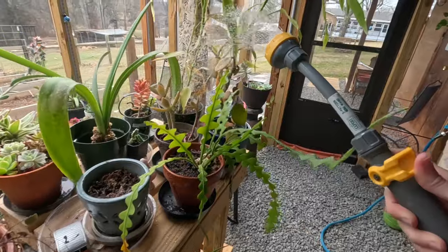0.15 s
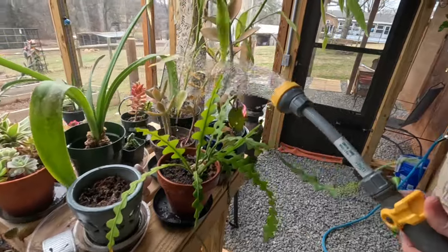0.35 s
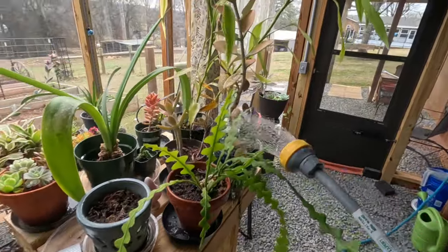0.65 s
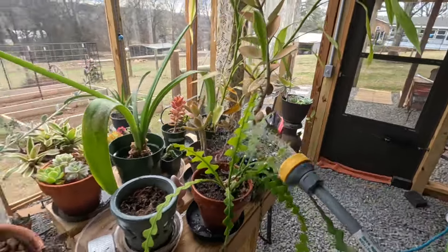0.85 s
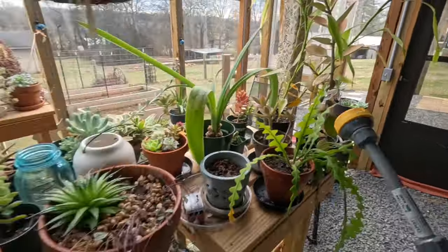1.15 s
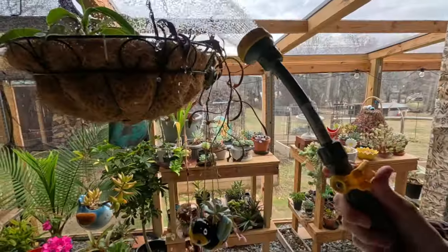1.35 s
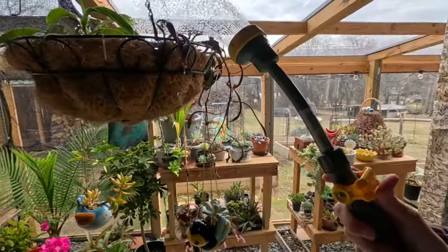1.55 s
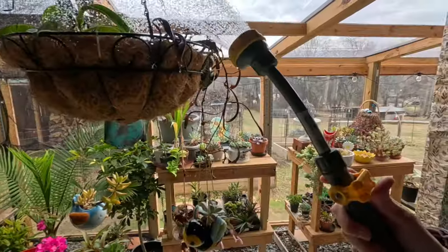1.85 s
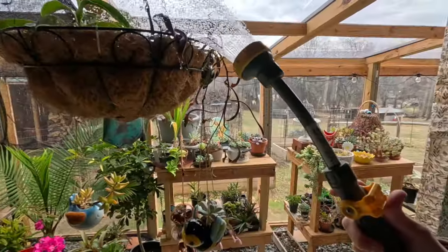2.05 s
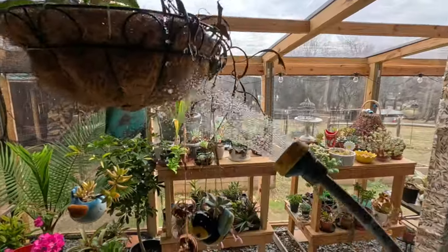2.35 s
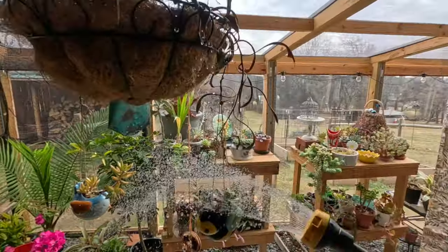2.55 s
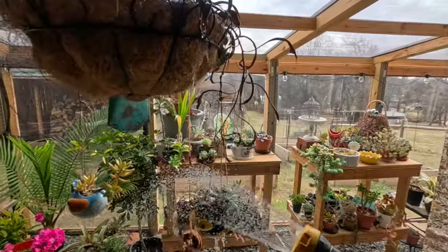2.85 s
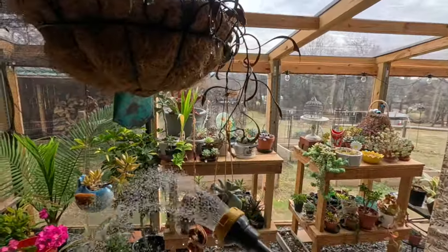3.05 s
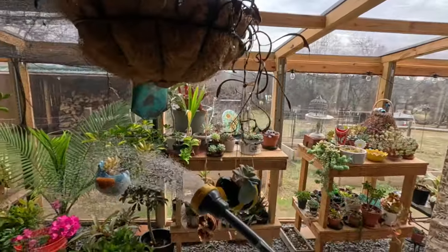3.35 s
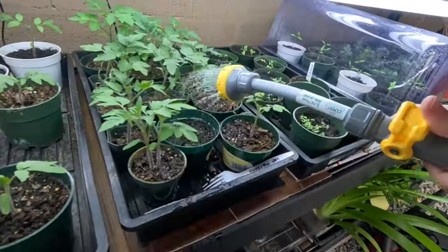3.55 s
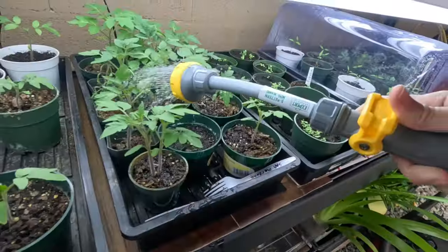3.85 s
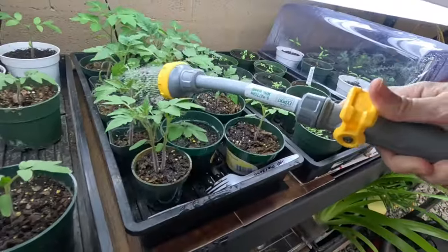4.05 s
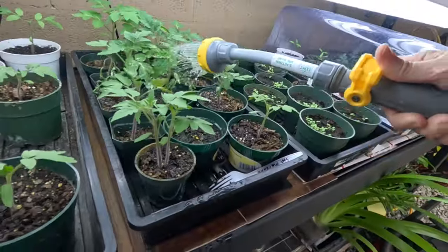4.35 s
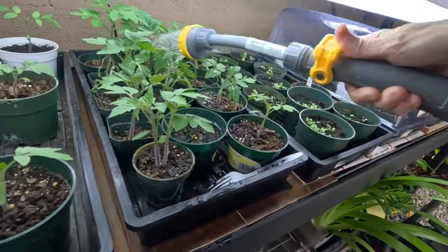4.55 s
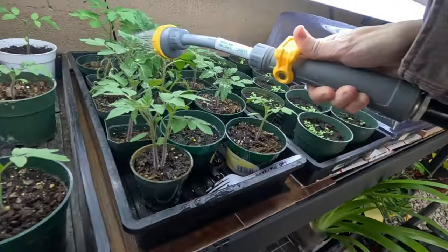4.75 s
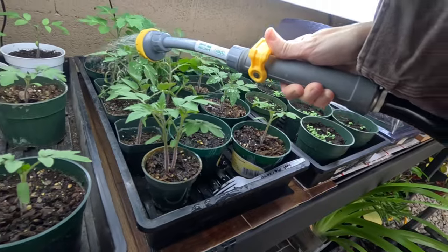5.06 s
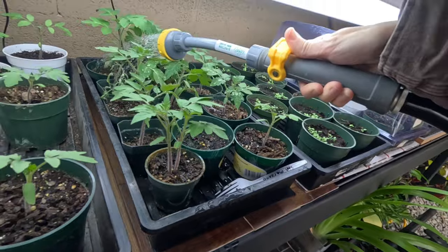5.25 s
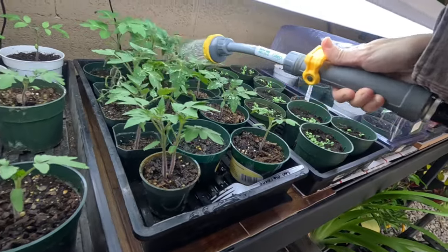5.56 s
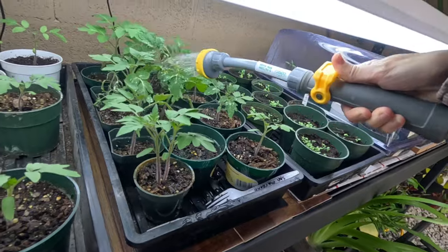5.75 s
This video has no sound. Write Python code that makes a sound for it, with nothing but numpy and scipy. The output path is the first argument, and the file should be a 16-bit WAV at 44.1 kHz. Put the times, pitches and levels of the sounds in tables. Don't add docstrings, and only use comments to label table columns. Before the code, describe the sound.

Three joined shots of watering plants: spray over pots, stopping briefly with draining water and a leaf brush; spray at a hanging basket, with many uneven knocking drips on a hollow tub; then steady spray on seedlings. The hiss is airy and high, ringing slightly in the tube and shifting as the wand moves. Low gusty rumble and a soft fan hum lie beneath. Close stereo microphone, short glassy greenhouse reflections.

```python
import sys
import numpy as np
from scipy import signal
from scipy.io import wavfile
from scipy.ndimage import uniform_filter1d

SR = 44100
rng = np.random.default_rng(int(sys.argv[2]) if len(sys.argv) > 2 else 0)


def linear_from_db(decibels):
    return 10 ** (np.asarray(decibels, float) / 20)


def master(y):
    cut = np.clip(np.atleast_2d(y).T, -1, 1)
    pcm = np.round(cut * 32767)
    wavfile.write(sys.argv[1], SR, pcm.astype(np.int16))


N = 259749
FRAME = 1024
BINS = np.fft.rfftfreq(FRAME, 1 / SR)

SPOTS = [0, 1.2175, 3.471, 5.9]

# time in seconds, nearness in dB, swing across the view,
# upward tilt, drop towards the bench (these three in units of pose, 0 = usual).
POSE = [
    [(0, 0, 0.58, -0.066, 0.21), (.35, 0.8, 0.27, 0.25, 0.55), (.9, 0.2, -0.75, 0.017, -0.6)],
    [(1.22, -0.5, 0.48, 1, 1), (1.7, 1, 1.26, 0.9, 0.44), (2.1, .2, 2.3, 1.8, -0.24),
     (2.5, 0, -1, -0.5, 0.42), (2.92, -0.7, -1.4, -0.3, -0.4), (3.15, 0.3, 1.8, 4, -0.8),
     (3.47, -0.1, -0.8, 3, -1.2)],
    [(3.47, -1, -0.41, 0.47, 1.6), (3.85, 1.45, -0.54, 0.027, 1.3), (4.25, 0.75, -0.76, 0.088, 1.7),
     (4.6, -0.7, -1.64, -0.61, -0.92), (4.85, 0.6, 1.2, -0.91, -1.6), (5.15, 1, 1.2, 0.5, -1.8),
     (5.55, 0.5, -0.43, -0.3, -0.5), (5.89, -1, 0.74, -1.4, -1.7)],
]
# time in seconds, flow in dB.
VALVE = [(.93, 0.5), (.98, -5.5), (1.01, -24.5), (1.04, -36), (1.07, -41), (1.2, -64)]
TUBE_HZ = [(2810, 4830, 5800, 7050, 7960, 9220), (2574, 4964, 5720, 7160, 7760, 9980),
           (2875, 4745, 5730, 7000, 7670, 10700)]
TUBE_DB = [(-30.5, -29, -36, -44, -31.5, -31), (-33, -28, -34, -27.5, -29, -34),
           (-33.5, -27, -28, -29.5, -31, -34)]
TUBE_WIDTH_HZ = [640, 584, 478, 510, 443]
# dB per unit of swing, of tilt, of drop.
BEAMS = [(-1.5, 2.5, 3.25), (3, -0.16, 1.9), (2, 1, 1.2), (-1, -3.5, 0.13), (-4.5, -0.5, 1.5),
         (2.5, -3.5, 0.98)]
# pitch in Hz, width in Hz, level in dB.
GRIP = [(1279, 140, -50), (967, 60, -61)]
FIRST_HZ_PER_TILT, SECOND_HZ_PER_DROP, PLATE_HZ_PER_SWING = 153, -68, 200
PLATE_WIDTH_HZ = 1150
BENCH_HZ = (3930, 3990, 3610)
BENCH_DB_PER_TILT, BENCH_DB_PER_DROP = 1, -3
PAN_DB_PER_DROP = -0.46

# frequency in Hz, level in dB per Hz.
FIZZ_POTS = [(410, -59), (700, -29), (905, -14.5), (1090, -23.5), (1270, -11.5), (1910, -15), (2690, -3),
             (4330, -5), (5070, 3), (6320, -3.5), (7050, 4.5), (8900, -9.5), (13000, -18)]
# frequency in Hz, level in dB per Hz.
FIZZ_BASKET = [(410, -69), (700, -68), (916, -14), (1110, -26), (1290, -12.5), (1930, -20.5), (2890, -3.5),
               (4220, -10), (4950, 0.5), (6320, -7), (7050, -1.5), (9230, -8.5), (10300, -12), (13000, -23)]
# frequency in Hz, level in dB per Hz.
FIZZ_TRAY = [(410, -62), (700, -38), (1140, -26), (1290, -15.5), (1880, -17), (2690, -3), (3690, -9),
             (4660, -4), (6320, -2.5), (7140, -5.5), (8470, -7.5), (11500, -11.5), (13000, -17)]
# frequency in Hz, gain in dB.
TOP = [(12400, 0), (13200, -3), (14500, -14)]
# frequency in Hz, level in dB per Hz.
WET = [(150, -27), (240, 2.5), (504, -7.5), (939, -14.5), (1140, -11.5), (1340, -17), (1980, -16.5),
       (2200, -19), (14000, -51)]
WET_DB = (-58, -67, -59)
# frequency in Hz, level in dB per Hz.
DRAIN = [(530, -52), (900, -26), (1130, -8), (1550, -9), (1990, -17), (2150, -12), (13500, -25.5)]
# time in seconds, level in dB.
DRAIN_DB = [(1, -53), (1.07, -47), (1.12, -44.5), (1.2, -44)]
# middle in seconds, level in dB, half length in seconds.
RUSTLES = [(.3, -59, 0.25), (0.905, -48.5, 0.082), (1.174, -42, 0.048), (3.86, -51, 0.22),
           (4.266, -50, .045), (5.35, -59, 0.16)]
FIZZ_DB, FIZZ_DB_PER_SWING = (-32, -30, -30), -0.2
DRIBBLE_DB = 9
SPLASH_DB, SPLASH_T60_S = -16, 0.51

# frequency in Hz, level in dB per Hz.
RUMBLE = [(12, -31), (22, -4.5), (57, 12.5), (90, -1), (125, 0.5), (190, -6.5), (290, -30), (400, -47),
          (600, -66), (900, -120)]
# middle in seconds, level in dB.
GUSTS = [(.3, -39), (1.04, -37.5), (1.55, -37), (2.05, -34), (3.25, -36), (3.62, -33.5), (4.45, -32.5),
         (4.67, -34), (4.83, -38), (5.55, -40), (5.85, -42)]
RUMBLE_DB = (-38, -39, -36.5)
GUST_S, GUSTY_DB = 0.078, 1

# time in seconds, level in dB.
HUM = [(0, -53), (1.2, -53.5), (1.5, -47), (2.5, -48), (3.3, -50), (3.6, -40.5), (4.55, -39), (4.71, -49),
       (4.84, -43.5), (4.99, -54), (5.38, -40), (5.89, -48.5)]
HUM_HZ = 163

# pitch in Hz, level in dB, t60 in seconds.
POT = (230, -25, 0.14)
# start in seconds, peak in dB, brightness in dB, lean to the deepest mode in dB.
DRIPS = [(1.438, -15.5, -7.5, -4), (1.476, -31, -4, 5), (1.546, -19, -0.5, -3), (1.612, -20.5, 3, -12),
         (1.736, -27.5, 4.5, -3), (1.846, -18, -4, -1), (1.885, -24.5, -1.5, -24), (2.212, -31.5, -4, -10),
         (2.261, -18.5, -14, -5.5), (2.297, -44, -14, -6), (2.385, -29, -13, -1), (2.413, -24.5, -4, -3),
         (2.507, -14.5, -5, 6), (2.539, -29, -13, 1), (2.658, -38, 5, 0), (2.682, -12.5, -15, -0.5),
         (2.767, -19.5, -15, 1), (2.806, -21.5, 0, 1), (2.864, -24.5, 6.5, 9), (2.917, -13, 1, -11),
         (2.954, -16, -3, 15), (2.963, -18, -14, -25), (3.013, -41, -1, 0), (3.093, -26.5, -6, -12),
         (3.177, -18.5, 0, -4), (3.234, -23, 2.5, -8), (3.337, -21, -10, 4), (3.411, -20, 2, -1),
         (3.433, -25, -5, -5)]
# start in seconds, peak in dB, brightness in dB, lean in dB.
STRAYS = [(0.86, -42, 15, -6), (1.168, -39, -14, -13), (3.622, -36, -1, -7), (3.764, -34, -6, -1),
          (4.215, -36, -13, 23), (4.259, -28, -9, -8), (4.925, -52, 21, 2), (4.954, -49, 17, 16),
          (5.222, -46, 18, 3), (5.245, -47, 19, 0), (5.379, -40, 0, 6)]
# pitch in Hz, level in dB, share of the t60.
WALLS = [(267, 0, 1.3), (334, 1, 1), (385, -9, .7), (506, -5, .75), (592, -7, .8)]
# pitch in Hz, level in dB, share of the t60.
RIM = [(830, 0, .3), (918, 6, .5), (1010, 1, .3), (1262, 4, .4), (1430, 3, .3), (1650, 2, .25),
       (2000, -3, .2)]
TUB_T60_S, TRAY_T60_S = 0.13, 0.069
TRAY_FACTOR = 1.7
SCATTER_DB = 2.5
# start in seconds, peak in dB.
TICKS = [(1.057, -37), (1.07, -56), (1.097, -42), (1.159, -50)]

# frequency in Hz, likeness 0-1.
SAME = [(60, .985), (300, .96), (700, .8), (1500, .78), (3000, .9), (4800, .88), (5600, .7), (6200, .45),
        (7000, .65), (7800, .7), (13500, .3)]
# frequency in Hz, radians by which the left leads.
LEAD = [(100, -.05), (700, -.15), (1400, -.3), (2700, -.7), (3500, -.85), (4800, -.65), (5600, -.4),
        (6300, 0), (6900, .75), (7600, .2), (8300, 0)]
# frequency in Hz, left minus right in dB.
TILT = [(300, 1), (1300, 0), (2500, -2.5), (4800, -3), (6000, -2), (7000, 5), (8300, -0.5), (13000, .3)]
# time in seconds, frequency in Hz where the treble starts to drop out.
BANDWIDTH = [(0, 13700), (1.4, 13300), (1.55, 14000), (2.45, 14100), (2.5, 12900), (3, 13000), (3.1, 13650),
             (5.89, 13750)]
# frequency in Hz, chance 0-1 that a left-right difference band stays.
KEEP_SIDE = [(1700, 1), (2000, .8), (2400, .98), (7400, 1), (8000, .55), (8400, .006), (11500, .01),
             (11900, .45), (12500, .5), (13100, .15), (13700, 0)]


def evened(x):
    return x / np.sqrt(np.mean(x ** 2) + 1e-20)


def read(points, hz):
    f, value = np.transpose(points)
    return np.interp(np.log(hz + 1), np.log(f + 1), value)


def columns(rows, t):
    s, *values = np.transpose(rows)
    return [np.interp(t, s, v) for v in values]


def unit(shape, lo=0, hi=SR):
    return shape / shape[(BINS >= lo) & (BINS < hi)].sum(0)


def peak(hz, width):
    return unit((1 + (2 * (BINS[:, None] - hz) / width) ** 2) ** -2.2)


def patches(frames, bins, long):
    z = rng.standard_normal((frames, len(BINS)))
    z = uniform_filter1d(z, long, 0)
    return evened(uniform_filter1d(z, bins, 1)).T


def swells(rows, t):
    return sum(linear_from_db(2 * db) * np.exp(-((t - s) / half) ** 2) for s, db, half in rows)


def ports(shared, stray, hz):
    same = np.clip(read(SAME, hz), 0, 1)
    turn = np.exp(.5j * read(LEAD, hz))
    tilt = linear_from_db(read(TILT, hz) / 2)
    left = shared * turn * tilt
    right = (same * shared + np.sqrt(1 - same ** 2) * stray) / (turn * tilt)
    mean_power = (tilt ** 2 + tilt ** -2. + 2 * same * (turn ** 2).real) / 4
    return np.array([left, right]) / np.sqrt(mean_power)


def noise(power, size=FRAME):
    a, b, c, d = rng.standard_normal(power.shape[::-1] + (4,)).T
    hz = np.fft.rfftfreq(size, 1 / SR)[:, None]
    z = ports(a + 1j * b, c + 1j * d, hz) * np.sqrt(power * 3 / 4)
    return signal.istft(z, nperseg=size, noverlap=size * 3 // 4)[1]


def valve_db(spot, t):
    return columns(VALVE, t)[0] * (spot == 0)


def wand(spot, t):
    near_db, swing, tilt, drop = columns(POSE[spot], t)
    levels_db = np.array(TUBE_DB[spot])[:, None] + near_db + np.array(BEAMS) @ [swing, tilt, drop]
    first, second, *upper, plate = TUBE_HZ[spot]
    first = first + FIRST_HZ_PER_TILT * tilt
    second = second + SECOND_HZ_PER_DROP * drop
    plate = plate + PLATE_HZ_PER_SWING * swing
    pitches = (first, second, *upper, plate)
    widths = (*TUBE_WIDTH_HZ, PLATE_WIDTH_HZ)
    tube = sum(linear_from_db(2 * db) * peak(hz, width) for db, hz, width in zip(levels_db, pitches, widths))
    grip = sum(linear_from_db(2 * db) * peak(hz, width) for hz, width, db in GRIP)
    comb_db = 2.0 * patches(len(t), bins=3, long=22) + 1.23 * patches(len(t), bins=100, long=5)
    return (tube + grip) * linear_from_db(2 * (comb_db + valve_db(spot, t)))


def splashes(spot, t):
    here = [row[:2] for row in DRIPS + STRAYS if SPOTS[spot] < row[0] < SPOTS[spot + 1]]
    s, db = np.transpose(here)[:, :, None]
    fading_db = db + SPLASH_DB - 60 * abs(t - s) / SPLASH_T60_S
    return (linear_from_db(2 * fading_db) * (t > s)).sum(0)


def spray(spot, t):
    near_db, swing, *_ = columns(POSE[spot], t)
    flow_db = valve_db(spot, t)
    dribble_db = np.clip(-flow_db / 3, 0, DRIBBLE_DB)
    fizz_db = FIZZ_DB[spot] + near_db + FIZZ_DB_PER_SWING * swing + flow_db + dribble_db
    colour = [FIZZ_POTS, FIZZ_BASKET, FIZZ_TRAY][spot][:-1]
    jets = unit(linear_from_db(2 * (read(colour, BINS) + read(TOP, BINS))), lo=8590, hi=12580)[:, None] * linear_from_db(2 * fizz_db)
    rustles = swells([row for row in RUSTLES if row[0] > SPOTS[spot]], t)
    patter = linear_from_db(2 * (WET_DB[spot] + flow_db)) + rustles + splashes(spot, t)
    wet = unit(linear_from_db(2 * read(WET, BINS)), lo=300, hi=970)[:, None] * patter
    drain_db = columns(DRAIN_DB, t)[0] - 99 * (spot > 0)
    drain = unit(linear_from_db(2 * read(DRAIN, BINS)))[:, None] * linear_from_db(2 * drain_db)
    flicker_db = 2.9 * patches(len(t), bins=4, long=25) + 0.47 * patches(len(t), bins=90, long=2)
    return (jets + wet + drain) * linear_from_db(2 * flicker_db)


def bench(spot, t):
    _, _, tilt, drop = columns(POSE[spot], t)
    dips = sum(np.exp(-((BINS[:, None] - BENCH_HZ[spot] / k) / 280) ** 2) for k in (1, 2))
    return linear_from_db(2 * (BENCH_DB_PER_TILT * tilt + BENCH_DB_PER_DROP * drop) * dips)


def thrift(x, start):
    mid_side = [x[0] + x[1], x[0] - x[1]]
    hz, t, z = signal.stft(mid_side, SR, "cosine", nperseg=2048, noverlap=1024)
    luck = rng.random((len(t) // 2 + 1, 65, 2)).repeat(2, 0)[:len(t)].T
    band_hz = (np.arange(65)[:, None] + .5) * 16 * hz[1]
    over = (band_hz - columns(BANDWIDTH, start + t)[0]) / 1300
    keep = luck < np.array([.4 - over, read(KEEP_SIDE, band_hz) + 0 * over])
    hole_chance = np.clip((hz[:, None] - 6000) / 70000, 0, 1)
    holes = rng.random((len(t), 257)).T.repeat(4, 0)[:len(hz)] < hole_chance
    z = z * keep[:, np.arange(len(hz)) // 16] * ~holes
    mid, side = signal.istft(z, SR, "cosine", nperseg=2048, noverlap=1024)[1]
    return np.array([mid + side, mid - side]) / 2


def rumble(spot, count):
    t = SPOTS[spot] + np.arange(count // 512 + 5) * 512 / SR
    hz = np.fft.rfftfreq(2048, 1 / SR)
    shape = linear_from_db(2 * read(RUMBLE, hz))
    shape = shape / shape[(hz >= 30) & (hz < 130)].sum()
    level = linear_from_db(2 * RUMBLE_DB[spot]) + swells([(*gust, GUST_S) for gust in GUSTS], t)
    restless = evened(uniform_filter1d(rng.standard_normal(len(t)), size=6))
    level = level * linear_from_db(2 * GUSTY_DB * restless)
    return noise(shape[:, None] * level, size=2048)[:, :count]


def fan():
    wander = evened(signal.resample(rng.standard_normal((2, 90)), N, axis=1))
    turns = np.cumsum(HUM_HZ + 1.2 * wander[0]) / SR
    level_db = columns(HUM, np.arange(N) / SR)[0] + 1.2 * wander[1]
    return np.sqrt(2) * linear_from_db(level_db) * np.sin(2 * np.pi * turns + np.array([[-.13], [.13]]))


def clay_pot():
    t, out = np.arange(12000) / SR, np.zeros(N)
    hz, db, t60 = POT
    out[:len(t)] = linear_from_db(db - 60 * t / t60) * np.sin(2 * np.pi * hz * t)
    return out


def drips():
    t, out = np.arange(12000) / SR, np.zeros(N + 12000)
    spread, rise = .01, 1 - np.exp(-t / .0009)
    rows = DRIPS + STRAYS
    for (s, db, bright_db, lean_db), luck in zip(rows, rng.standard_normal((len(rows), 24))):
        smaller, t60 = (TRAY_FACTOR, TRAY_T60_S) if s > SPOTS[2] else (1, TUB_T60_S)
        modes = WALLS[:1] + [(hz * smaller, d, share) for hz, d, share in WALLS[1:]] + RIM
        ring = []
        for (hz, d, share), u, v in zip(modes, luck[:12], luck[12:]):
            decay = linear_from_db(d + SCATTER_DB * u - 60 * t / (share * max(t60, .02)))
            ring.append(decay * np.sin(2 * np.pi * hz * (1 + spread * v) * t))
        walls = linear_from_db(lean_db) * ring[0] + sum(ring[1:len(WALLS)])
        rim = sum(ring[len(WALLS):])
        sound = walls / abs(walls).max() + linear_from_db(bright_db + 3.5) * rim / abs(rim).max()
        out[round(s * SR):][:len(t)] += linear_from_db(db + 2.0) * sound * rise
    return out[:N]


def last_droplets():
    t, out = np.arange(12000) / SR, np.zeros(N)
    for s, db in TICKS:
        out[round(s * SR):][:len(t)] += linear_from_db(db - 60 * t / .006) * np.sin(2 * np.pi * 11600 * t)
    return out


def greenhouse(x):
    at = np.arange(200, 9000, 20) + rng.integers(0, 20, (2, 440))
    taps = np.zeros((2, 9100))
    echoes = rng.choice([-1., 1.], at.shape) * linear_from_db(-60 * at / SR / 0.4)
    np.put_along_axis(taps, at, echoes, 1)
    wet = signal.oaconvolve(x[None], taps / np.linalg.norm(taps[0]), axes=1)[:, :N]
    return x * linear_from_db([[.4], [-.4]]) + linear_from_db(-10.5) * (wet + .35 * wet[::-1])


def scene():
    out = np.zeros((2, N))
    tub = greenhouse(clay_pot() + drips() + last_droplets())
    edges = np.minimum(np.round(np.array(SPOTS) * SR).astype(int), N)
    for spot, (a, b) in enumerate(zip(edges, edges[1:])):
        t = SPOTS[spot] + np.arange((b - a) * 4 // FRAME + 12) * FRAME / 4 / SR
        water = noise((wand(spot, t) + spray(spot, t)) * bench(spot, t))
        water = thrift(water, start=SPOTS[spot])
        lean_db = PAN_DB_PER_DROP * columns(POSE[spot], np.arange(a, b) / SR)[3]
        out[:, a:b] = water[:, :b - a] * linear_from_db(lean_db * [[.5], [-.5]]) + rumble(spot, count=b - a)
        tub[:, a:b] *= 1 - (spot > 0) * np.exp(-(np.arange(b - a) / (.1 * SR)) ** 4)
    return out + tub + fan()


def roll_off(x):
    return signal.sosfilt(signal.butter(12, 14660, fs=SR, output="sos"), x)


def record(dry):
    return roll_off(dry)


dry = scene()
out = record(dry)
master(out)
```